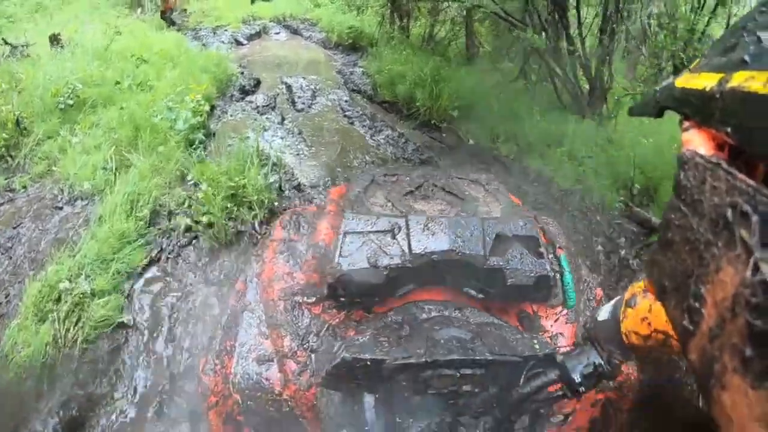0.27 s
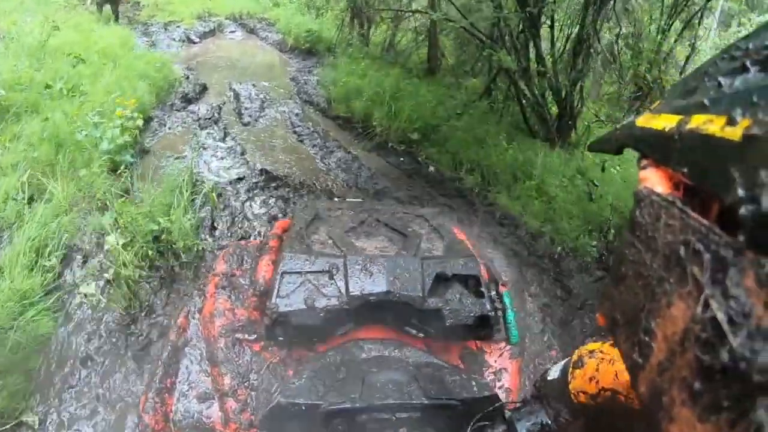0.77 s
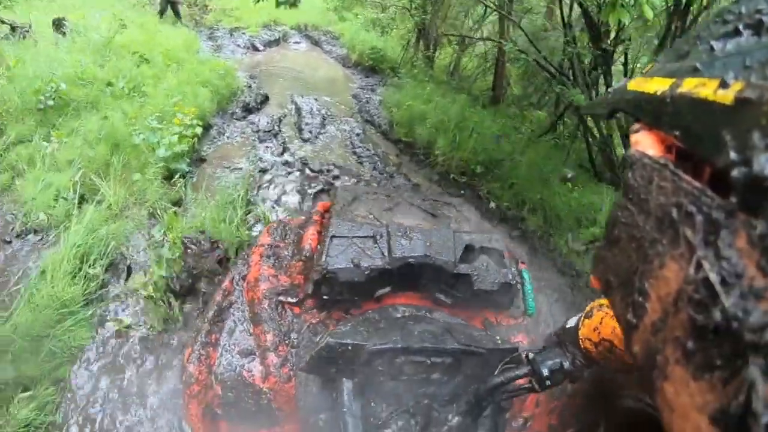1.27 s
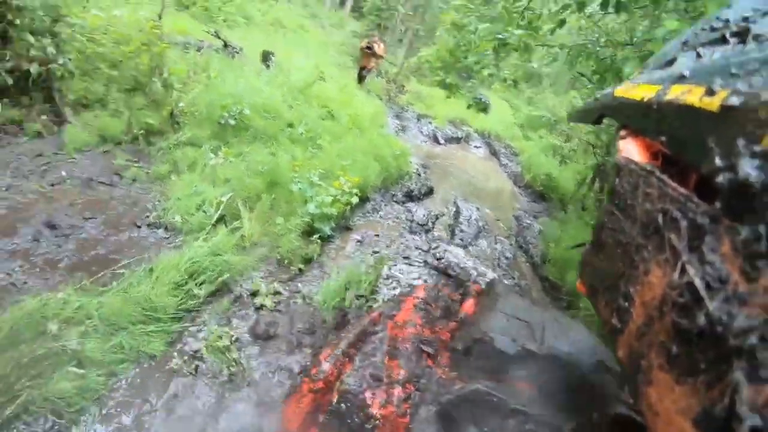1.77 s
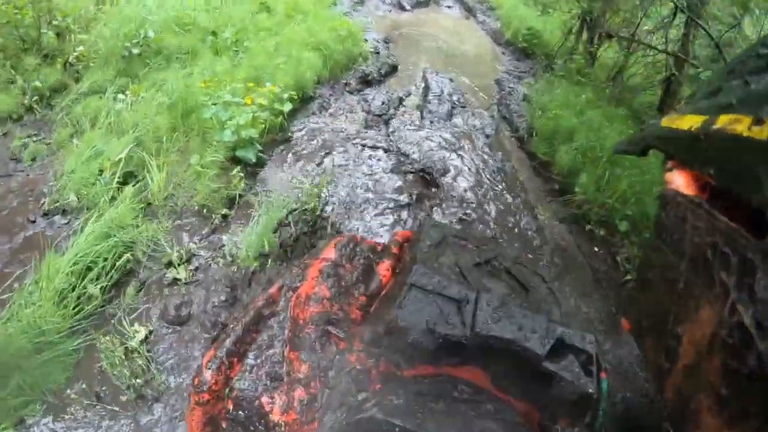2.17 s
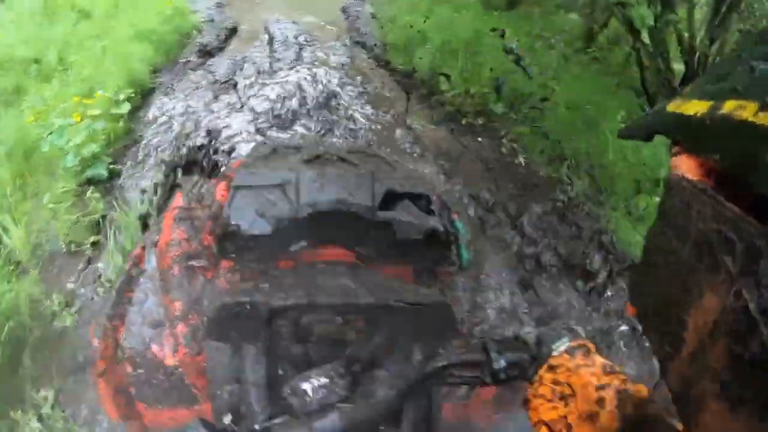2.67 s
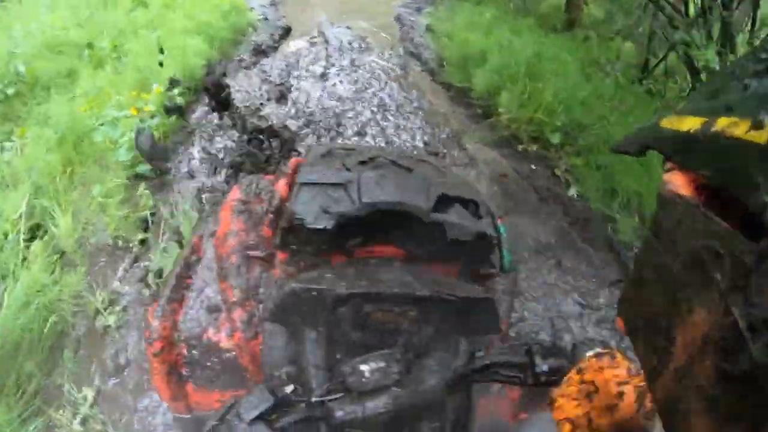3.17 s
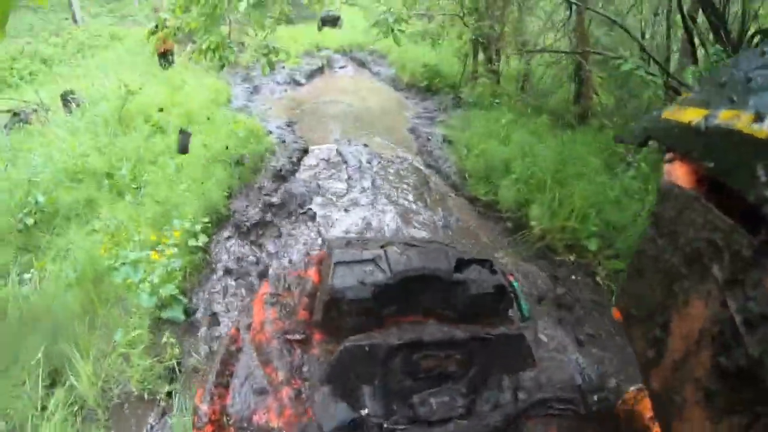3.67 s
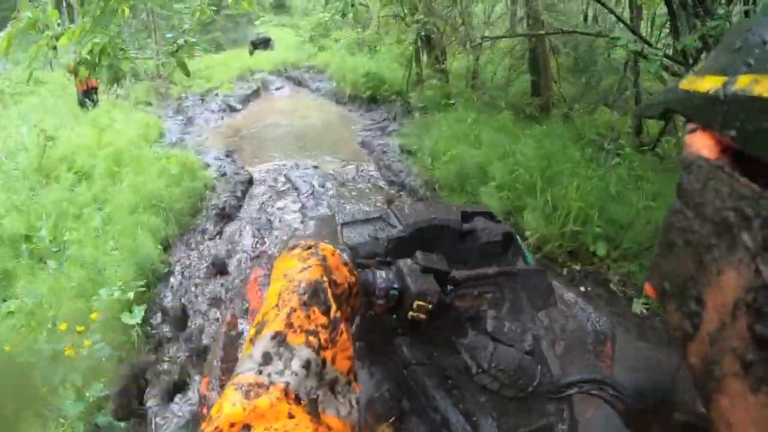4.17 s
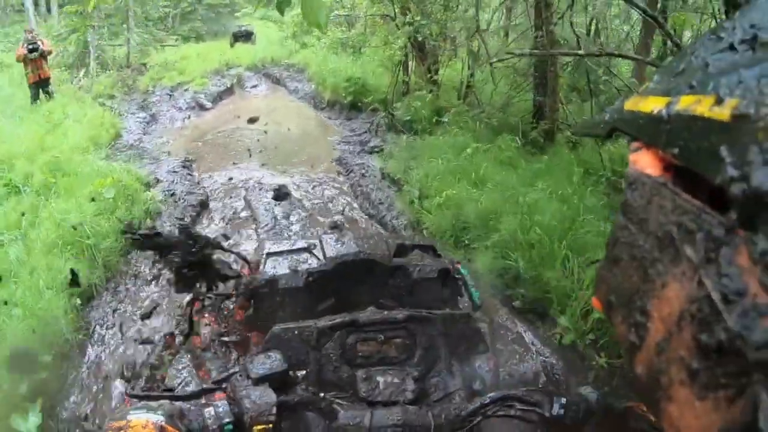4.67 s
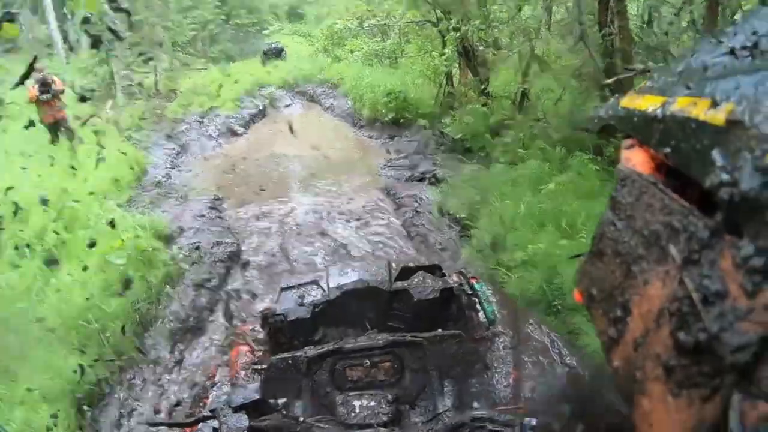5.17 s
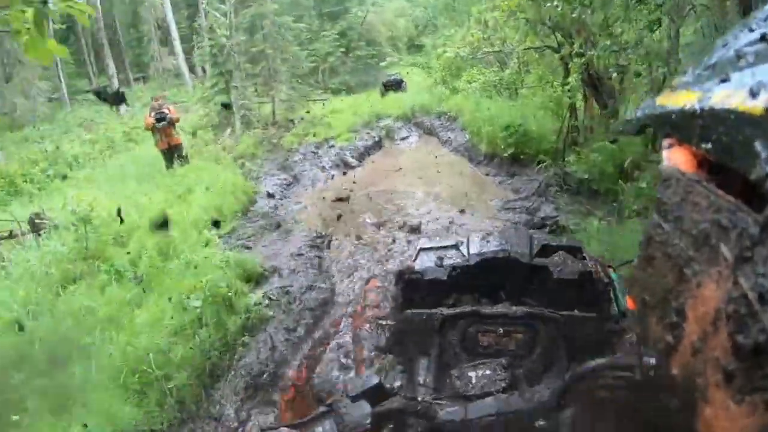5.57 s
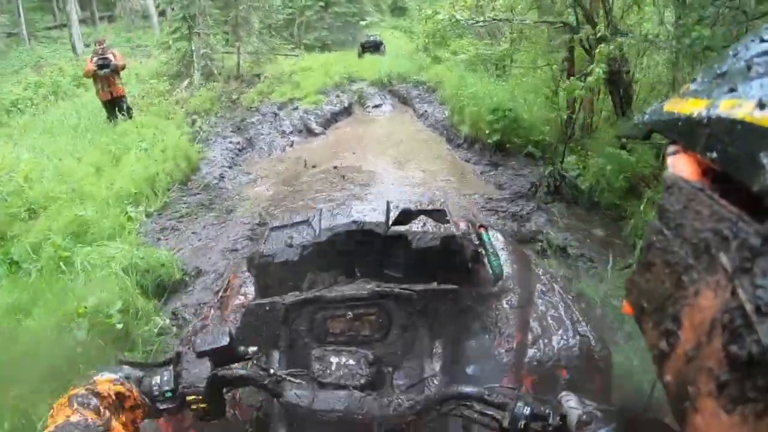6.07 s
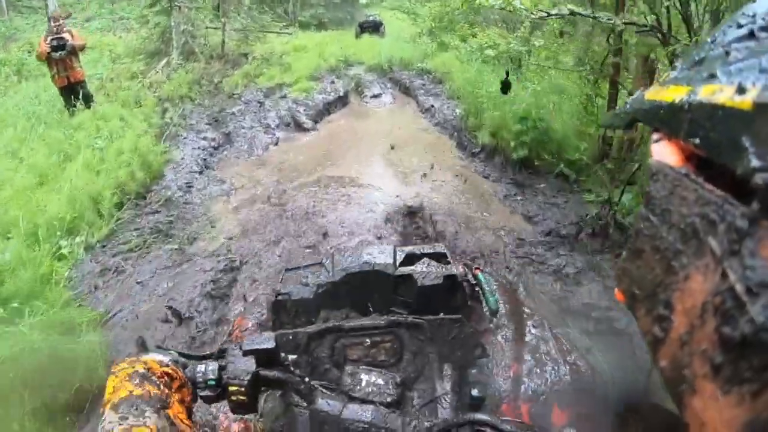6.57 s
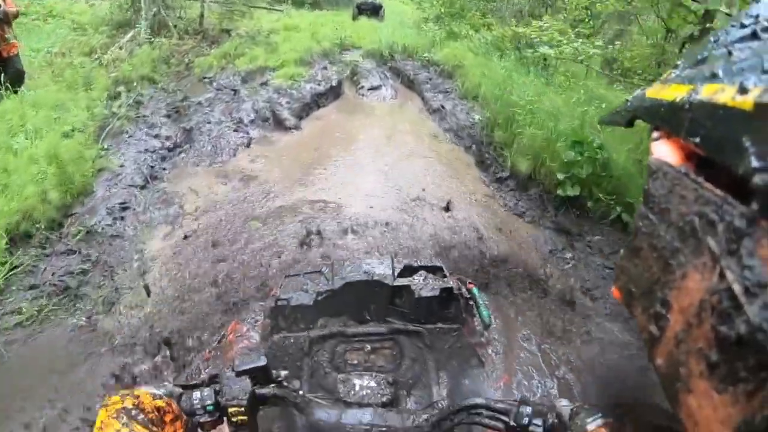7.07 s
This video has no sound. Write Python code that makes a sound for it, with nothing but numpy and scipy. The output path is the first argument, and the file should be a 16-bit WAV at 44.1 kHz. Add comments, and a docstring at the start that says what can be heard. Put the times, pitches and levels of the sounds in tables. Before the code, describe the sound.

Deep, raspy quad engine roar heard close from the rider's helmet, straining through mud with faint clatter, belt squeals, spray and sharp mud slaps.

```python
"""Muddy trail ride

A V-twin all-terrain vehicle ploughs through mud, heard from the rider's helmet.
The exhaust drones as stacked tones and rasps as shaped noise, while the revs rise and sag.
Drive belt and gears sing faintly as narrow noise bands and a speed-following tone; moving parts clatter.
Tyres throw a hissing spray of noise and drops; clods land as short filtered knocks.
The loud drone presses on a limiter."""
import sys
import numpy as np
from scipy import signal
from scipy.fft import rfft, irfft
from scipy.io import wavfile
from scipy.ndimage import uniform_filter1d, minimum_filter1d, map_coordinates

SR = 44100
rng = np.random.default_rng(int(sys.argv[2]) if len(sys.argv) > 2 else 0)


def generate_wav(signal):
    """Clip the signal to [-1, 1] and save it as 16-bit WAV at the path in sys.argv[1]."""
    frames = np.transpose(np.atleast_2d(signal))
    scaled = np.clip(frames, -1, 1) * 32767
    pcm = np.round(scaled).astype(np.int16)
    wavfile.write(sys.argv[1], SR, pcm)


N = 322812
TIME = np.arange(N) / SR
BINS = np.fft.rfftfreq(N, 1 / SR)
CRUISE_HZ = 49.5  # engine cycles a second at cruising speed
EDGE_HZ = 14400  # upper edge of the final sound
# the engine works harder at high revs and while it picks up speed
EFFORT_DB_PER_HZ, EFFORT_DB_PER_HZ_PER_S = 0.98, 0.0975
# clatter and spray grow with revs above cruising
CLATTER_DB_PER_HZ, SPRAY_DB_PER_HZ = 0.45, 0.19

# engine speed: t/s, four-stroke cycle rate f/Hz
ENGINE_SPEED = [(0.0, 45.609), (0.48, 49.94), (0.847, 49.459), (1.001, 47.769), (1.347, 49.09),
                (1.947, 50.379), (2.095, 49.511), (2.341, 50.516), (2.528, 48.07), (2.904, 48.133),
                (3.356, 44.941), (3.634, 44.734), (3.972, 49.252), (4.276, 49.672), (4.669, 53.898),
                (5.054, 49.528), (5.26, 49.466), (5.679, 47.253), (6.018, 53.812), (6.186, 53.592),
                (6.504, 47.297), (6.868, 52.374), (6.978, 52.463), (7.32, 49.818)]
# load on the engine at cruising speed: t/s, level/dB
ENGINE_LOAD = [(0, -13), (.16, -9.5), (.55, -0.5), (1, -1.5), (1.15, -6), (1.46, -7.5), (1.68, -0.5),
               (2.3, -1), (2.65, -3.5), (3.5, 1.5), (5.05, 1), (5.37, 7.5), (5.8, 0), (7.32, 3.5)]
# uneven burning: t/s, basic share by which firings vary (0-1)
UNEVEN_BURNING = [(0, 0.21), (.8, 0.15), (.95, 0.23), (1.5, 0.35), (3.1, 0.066), (4, 0.049), (7.32, 0.21)]
# weak firings, which dip the drone: t/s, depth/dB, half length/s
WEAK_FIRINGS = [(0.015, 4, 0.015), (0.168, 5, .016), (0.475, 8, 0.004), (1.503, 5.5, 0.012)]
# what the exhaust pipe passes of the orders (multiples of the cycle rate): f/Hz, level/dB
PIPE_GAIN = [(44, -21), (54, -20), (90, -11), (108, -12.5), (135, -9.5), (160, -13.5), (180, -12),
             (205, -14), (225, -17), (265, -24), (290, -18), (320, -30), (345, -30), (365, -23), (405, -29),
             (450, -31.5), (490, -32.5), (550, -34.5), (605, -38.5), (660, -38.5), (700, -42.5),
             (750, -40.5), (810, -50), (900, -48.5), (1000, -67)]
# effort shifts sound between the orders: f/Hz, change/dB per dB of effort
EFFORT_TONE = [(100, 0.3), (150, 0), (200, 0.43), (250, -0.64), (300, 0.43), (355, .5), (450, 0.01),
               (600, 0.28), (900, -0.2)]
# extra level of the hum near 200 Hz: t/s, level/dB
HUM_LEVEL = [(0.0, 1), (1.4, 0.5), (1.8, -5.5), (2.4, 2.5), (3.75, -3.5), (4.15, 4.5), (5.1, 2.5),
             (5.35, -4.5), (5.75, 3), (6.3, -0.2), (7.32, 0.7)]
# extra level of the boom near 300 Hz: t/s, level/dB
BOOM_LEVEL = [(0, 9), (.2, 9.5), (.6, -4), (1.28, 4), (2.1, -8), (2.3, 1), (2.8, -5.5), (3.7, 3),
              (4.5, 4.5), (5.05, -1.5), (5.28, 4.5), (5.58, -20), (5.8, 3.5), (6.15, 3), (6.43, -7),
              (6.7, 10.5), (6.88, -4), (7.32, 4.5)]
# extra level of the honk near 450 Hz: t/s, level/dB
HONK_LEVEL = [(0.0, 4), (0.3, 4), (0.58, 13.5), (1.0, 9.3), (1.12, 3), (2.55, 5.5), (3.05, -3.3),
              (3.72, 10), (4.35, 0.7), (4.6, 4), (5.3, 12), (5.7, 4.5), (6.25, 12.5), (7.32, 8)]
# extra level of the blare near 600 Hz: t/s, level/dB
BLARE_LEVEL = [(0.0, 4.5), (0.8, 7.5), (1.0, 14.5), (1.28, -1.5), (1.78, 17), (2.1, 3), (2.6, 10.5),
               (3.6, 1.3), (4.25, 12.9), (4.5, 10), (5.3, 14.5), (5.6, -3), (6.3, 7), (6.65, -3),
               (6.85, 12), (7.32, 11)]
# tone colours of the noisy layers, where only the shape counts: f/Hz, level/dB
RASP_COLOUR = [(300, -32.5), (550, -37.5), (750, 5), (1000, 4), (1400, -2), (2000, -11), (3000, -18.5),
               (4000, -40.5)]
ROAR_COLOUR = [(15, -15), (40, -3), (100, 5), (200, -3), (320, 6.5), (450, -2), (620, -1.5), (800, -6.5),
               (1300, -11), (2000, -21.5), (3500, -38), (8000, -60)]
CLATTER_COLOUR = [(500, -25), (1200, -13.5), (1900, 1.5), (2700, -2), (3400, -7.5), (4000, -10.5),
                  (5500, -12.5), (9000, -36.5)]
SPRAY_COLOUR = [(1000, -22), (3000, -8.5), (4700, -9), (6000, 2), (7300, 0.5), (8300, -6), (9300, -6),
                (10400, -5.5), (11600, -14), (13500, -17.5), (15000, -28.5)]
# balance of the two microphone ports: f/Hz, left minus right level/dB
PORT_BALANCE = [(60, -1.5), (200, -2), (370, -2.5), (680, -6), (1240, -7), (2260, -5), (4150, .5),
                (6000, 3.87), (7200, -1), (8500, 5), (10400, 7), (12500, -1)]
# how alike the two ports hear a sound: f/Hz, likeness (0-1)
PORT_LIKENESS = [(280, 1), (620, 0), (1350, 0.33), (2900, 0.66), (6400, 0.2), (13000, 0)]
# base levels at cruising speed: t/s, clatter level/dB, mud spray level/dB
CHURN_LEVELS = [(0, -45, -56), (.3, -45, -53), (.7, -41.5, -49), (1.8, -42, -50), (2.4, -38.5, -43),
                (2.8, -39, -44), (3.9, -42, -46), (5.1, -40, -45), (6.1, -39.5, -45), (7.32, -39.5, -45)]
# brief belt squeals: peak t/s, half length/s, f/Hz, width/Hz, level/dB before the left-right lean
BELT_SQUEALS = [(1.926, 0.092, 1326, 130, -40), (2.55, 0.49, 1360, 150, -40.5),
                (2.72, 0.13, 1737, 160, -41.5), (2.76, 0.11, 2320, 300, -39), (2.78, 0.081, 2750, 300, -44),
                (3.313, 0.21, 1676, 150, -38.5), (3.45, 0.42, 2540, 130, -45.5)]
# gear whine before the left-right lean: t/s, level/dB
GEAR_LEVEL = [(0, -59), (4.4, -59), (4.8, -43), (5.1, -50), (5.7, -45), (6.1, -53), (6.45, -46.5),
              (6.8, -51), (7.32, -44)]
# clods and drops landing close by: t/s, relative peak level/dB, centre f/Hz, decay/s
CLOD_HITS = [(0.131, -40, 2980, 0.0011), (1.185, -31, 5000, .001), (2.469, -19, 2704, 0.0036),
             (2.9648, -18, 6100, .0006), (3.157, -21, 3000, .003), (4.4889, -33, 5000, 0.00098),
             (5.0861, -11, 3600, 0.00068), (5.12, -31, 5496, 0.0037), (6.0554, -32, 3501, .002)]
# smear after a clod lands: t/s, level/dB
SMEAR_LEVEL = [(5.08, -80), (5.1, -48), (5.14, -37.5), (5.17, -39), (5.21, -58), (5.25, -83)]


def amp(db):
    """Turns decibels into gain."""
    return 10 ** (np.asarray(db) / 20)


def evened(x):
    """Scales to rms 1; a stereo pair is scaled by its middle."""
    middle = np.atleast_2d(x).mean(0)
    return x / np.sqrt(np.mean(middle ** 2) + 1e-20)


def curve(rows, column=1):
    """Reads one column of a time table at every sample."""
    rows = np.asarray(rows)
    return np.interp(TIME, rows[:, 0], rows[:, column])


def read(points):
    """Reads a frequency table at every bin, with pitch-like (logarithmic) spacing."""
    hz, value = np.transpose(points)
    return np.interp(np.log(BINS + 1), np.log(hz + 1), value)


def wander(rate):
    """Smooth random drift of about rms 1; its movement fades out above about rate Hz."""
    slow_hz = np.fft.rfftfreq(4096, TIME[-1] / 4096)
    noise = rng.standard_normal(2 * len(slow_hz) - 2)
    drift = irfft(rfft(noise) * np.exp(-(slow_hz / rate) ** 2))
    return np.interp(TIME, np.linspace(0, TIME[-1], len(drift)), evened(drift))


def resonance(hz, width):
    """Gain of a resonance at every bin; width in Hz is between its half-gain points."""
    return 1 / (1 + (2 * (BINS - hz) / width) ** 2)


def ports(pair, colour):
    """Colours two unrelated signals and blends them as two ports hear one source."""
    a, b = rfft(pair)
    same = np.clip(read(PORT_LIKENESS), 0, 1)
    lean = amp(read(PORT_BALANCE) / 2)
    left = lean * (same * a + np.sqrt(1 - same ** 2) * b)
    right = a / lean
    return evened(irfft(np.array([left, right]) * colour, N))


def hiss():
    """White noise for both ports."""
    return rng.standard_normal((2, N))


def turn(hz, centre_hz, damping):
    """Phase lag, in radians, of a damped resonator driven at hz."""
    ratio = hz / centre_hz
    return np.arctan2(damping * ratio, 1 - ratio ** 2)


def over_cruise():
    """How far the engine runs above cruising speed, in cycles a second."""
    return curve(ENGINE_SPEED) - CRUISE_HZ


def effort(smoothing_s=.12):
    """How hard the engine works, in dB: load, revs and acceleration."""
    speedup = np.gradient(curve(ENGINE_SPEED)) * SR
    pickup = uniform_filter1d(speedup, int(smoothing_s * SR))
    return curve(ENGINE_LOAD) + EFFORT_DB_PER_HZ * over_cruise() + EFFORT_DB_PER_HZ_PER_S * pickup


def puffs(turns, second_firing, delay=0.411, strength_db=1):
    """Gas flow at the tailpipe: a dying puff after each of two firings, with drifting strength."""
    rise, decay, steady = .03, .26, .28  # rise, decay and delay are shares of a cycle
    ages = [(turns - delay - at) % 1 for at in (0, second_firing)]
    flow = steady + sum(np.exp(-age / decay) - np.exp(-age / rise) for age in ages)
    return evened(flow * amp(strength_db * wander(35)))


def drone(cycle_hz, turns, second_firing, pipe_hz=197, pipe_damping=0.096,
          chamber_hz=126, chamber_damping=0.35, sway_db=4.5, sway_rate=6,
          seesaw=1.13, hollow_from_db=-1, paths=1.0, shake=0.67, shared_shake=0.25,
          drone_db=-0.07, count=18):
    """Two unevenly spaced firings a cycle ring the exhaust pipe: a stack of clean orders."""
    bands = {4: HUM_LEVEL, 6: BOOM_LEVEL, 9: HONK_LEVEL, 12: BLARE_LEVEL}
    above_boom = (7, 8)
    push_db, uneven, shared = effort(), curve(UNEVEN_BURNING), wander(28)
    out = np.zeros((2, N))
    for k in range(1, count + 1):
        # each order slides through the pipe's fixed peaks and changes with effort
        hz = k * cycle_hz
        db = drone_db + np.interp(hz, *np.transpose(PIPE_GAIN))
        db += np.interp(hz, *np.transpose(EFFORT_TONE)) * push_db
        # four orders follow their own level curve; the others sway, high ones most
        if k in bands:
            db += curve(bands[k])
        else:
            db += min(k / 10, 1) ** 2 * sway_db * wander(sway_rate)
        # a hollow opens just above the boom as it grows
        if k in above_boom:
            db -= seesaw * np.maximum(curve(BOOM_LEVEL) - hollow_from_db, 0)
        # the pair of blows is delayed by the pipe's resonance and hastened by the silencer's chamber
        blows = 1 + np.exp(-2j * np.pi * k * second_firing)
        shift = np.angle(blows) - turn(hz, pipe_hz, pipe_damping)
        shift += turn(hz, chamber_hz, chamber_damping)
        # higher orders take many paths that change as the rider moves
        shift += paths * np.clip(k / 5 - 1, 0, 1) * wander(1.54)
        # uneven burning shakes the higher orders most
        flutter = 1 + uneven * min(k / 4, 2) * (shake * wander(26) + shared_shake * shared)
        tone = amp(db) * flutter * np.cos(2 * np.pi * k * turns + shift)
        lean_db = np.interp(hz.mean(), *np.transpose(PORT_BALANCE)) / 2
        out += amp([[lean_db], [-lean_db]]) * tone
    dip_db = sum(depth * np.exp(-((TIME - s) / half) ** 2) for s, depth, half in WEAK_FIRINGS)
    return np.sqrt(2) * out * amp(-dip_db)


def rasp(turns, flow, rasp_db=-34.0, follow=0.78, bite=0.64, size=880, count=40):
    """Each cycle repeats nearly the same ragged pressure pattern, which slowly changes its shape."""
    shapes = rng.standard_normal((2, count + 1, size))
    # walk slowly from shape to shape, and once through a shape each cycle
    place = [TIME / TIME[-1] * count, turns % 1 * size]
    pattern = np.array([map_coordinates(s, place, order=2, mode="grid-wrap") for s in shapes])
    level_db = follow * effort() + rasp_db
    return amp(level_db) * ports(pattern * flow ** bite, amp(read(RASP_COLOUR)))


def roar(flow, roar_db=-29.5, follow=0.46, uneven_db=12):
    """Turbulence in the exhaust puffs: it grows with effort and with uneven burning."""
    level_db = roar_db + follow * effort() + uneven_db * curve(UNEVEN_BURNING)
    return amp(level_db) * ports(hiss() * flow, amp(read(ROAR_COLOUR)))


def clatter(flow, throb=0.11, flicker_db=1):
    """Valve gear and transmission rattle, partly in step with the firings and louder at high revs."""
    shake = flow ** throb * amp(flicker_db * wander(65))
    level_db = curve(CHURN_LEVELS) + CLATTER_DB_PER_HZ * over_cruise()
    return amp(level_db) * ports(hiss() * shake, amp(read(CLATTER_COLOUR)))


def belt(ring_db=-53, ring_hz=3400, ring_width=120, ring_follow=.7):
    """Rubbing in the belt drive: a thin ring that follows the clatter table, and brief squeals."""
    song = np.zeros(N)
    for s, half, hz, width, db in BELT_SQUEALS:
        near = abs(TIME - s) < 3 * half
        t = TIME[near]
        # a randomly drifting grip spreads each tone into a narrow band
        grip = (wander(width / 2) + 1j * wander(width / 2))[near]
        squeal = (grip * np.exp(2j * np.pi * hz * t)).real
        song[near] += amp(db) * np.exp(-((t - s) / half) ** 2 / 2) * squeal
    churn_db = curve(CHURN_LEVELS)
    ring_level_db = ring_db + ring_follow * (churn_db - churn_db.mean())
    ring = amp(ring_level_db) * ports(hiss(), resonance(ring_hz, ring_width))
    return amp([[-2], [1.5]]) * song + ring


def gears(turns, waver=0.63):
    """A meshing gear whines at a fixed multiple of the engine speed."""
    teeth = 36  # tooth meetings per engine cycle
    whine = np.sqrt(2) * np.cos(2 * np.pi * teeth * turns) * (1 + waver * wander(16))
    return amp([[-3], [2]]) * amp(curve(GEAR_LEVEL)) * whine


def spray(spray_db=1, drops_per_s=700, drop_db=9, spread_db=3, surge_db=0.84):
    """Water and mud off the tyres: a surging hiss full of small drops, and one clod's smear."""
    drops = hiss() * (rng.random((2, N)) < drops_per_s / SR)
    # a few drops are much stronger than the rest
    drops *= amp(drop_db + spread_db * np.minimum(rng.exponential(1, (2, N)), 3) - 6)
    wash = ports((hiss() + drops) * amp(surge_db * wander(25)), amp(read(SPRAY_COLOUR)))
    smear = ports(hiss(), resonance(4900, 2000) + 0.75 * resonance(2600, 1600))
    level_db = curve(CHURN_LEVELS, column=2) + SPRAY_DB_PER_HZ * over_cruise() + spray_db
    return amp(level_db) * wash + amp(curve(SMEAR_LEVEL)) * smear


def clods(clod_db=.5, splat=.1, body=2.2):
    """Wet mud slaps on plastic: a sharp push with a dull knock below it, then a short dead splat."""
    out = np.zeros((2, N))
    knock = signal.butter(2, [600, 1600], "band", fs=SR, output="sos")
    t = TIME[:2048]
    for s, db, hz, decay in CLOD_HITS:
        # a one-sample push plus fading noise
        force = (t == 0) + splat * rng.standard_normal((2, len(t))) * np.exp(-t / decay)
        band = [hz * 0.98, min(hz * 1.17, SR / 2 - 1)]
        shell = signal.butter(2, band, "band", fs=SR, output="sos")
        slap = signal.sosfilt(shell, force) - body * signal.sosfilt(knock, force)
        peak = abs(slap.mean(0)).max()
        start = round(s * SR)
        out[:, start:][:, :len(t)] += amp(db + clod_db) * slap / peak
    return out


def scene():
    """The engine's turning drives the exhaust, clatter and gears; the mud sounds lie on top."""
    second_firing = 280 / 720  # share of a cycle, from crank degrees
    crank_start = .785  # share of a cycle
    cycle_hz = curve(ENGINE_SPEED)
    # add up the speed into turns, with a little jitter
    turns = crank_start + np.cumsum(cycle_hz) / SR + 0.0026 * wander(7.7)
    flow = puffs(turns, second_firing)
    engine = drone(cycle_hz, turns, second_firing) + rasp(turns, flow) + roar(flow) + clatter(flow)
    return engine + belt() + gears(turns) + spray() + clods()


def record(dry):
    """A fast limiter holds the louder port to full scale and ducks both; then the treble is cut."""
    room = 1 / np.maximum(abs(dry).max(0), 1)
    # duck a little before and after each peak, with smooth edges
    held = minimum_filter1d(room, size=120)
    gain = uniform_filter1d(uniform_filter1d(held, size=60), size=60)
    lowpass = signal.firwin(255, EDGE_HZ, window=("kaiser", 8), fs=SR)
    return signal.oaconvolve(dry * gain, lowpass[None], "same")


dry = scene()
out = record(dry)
generate_wav(out)
```